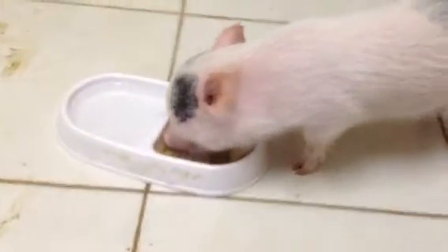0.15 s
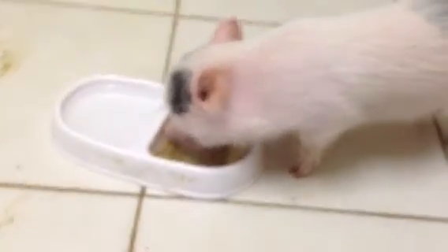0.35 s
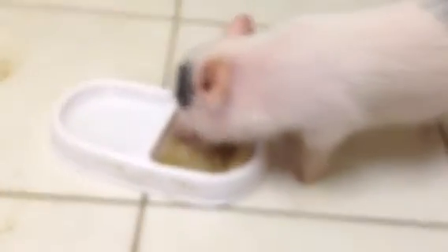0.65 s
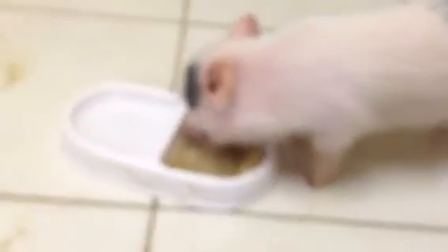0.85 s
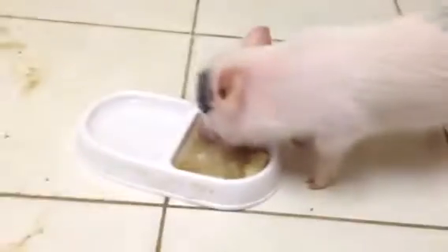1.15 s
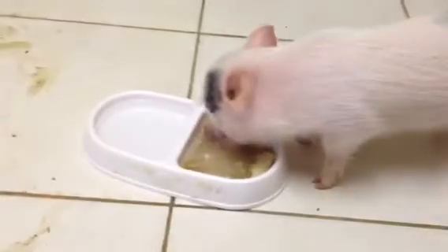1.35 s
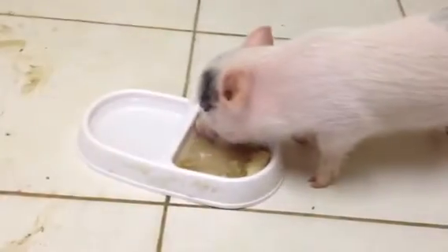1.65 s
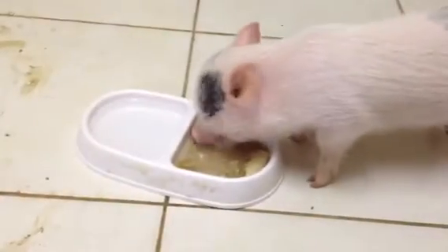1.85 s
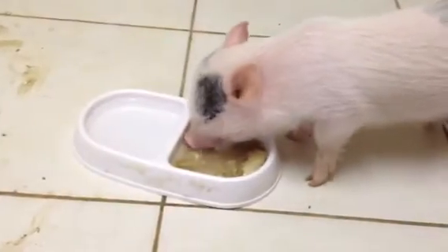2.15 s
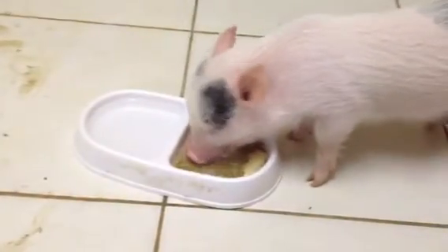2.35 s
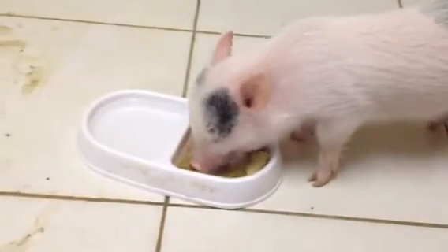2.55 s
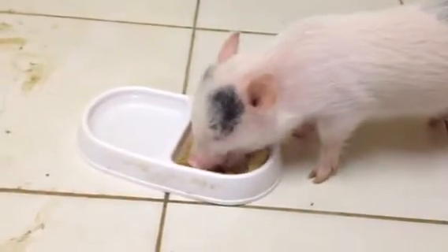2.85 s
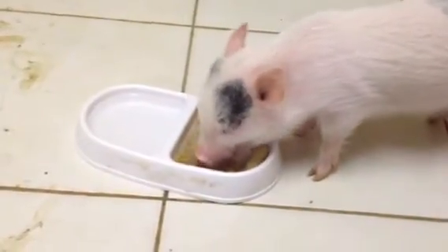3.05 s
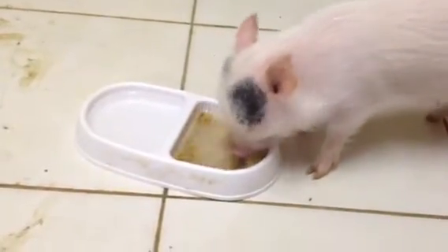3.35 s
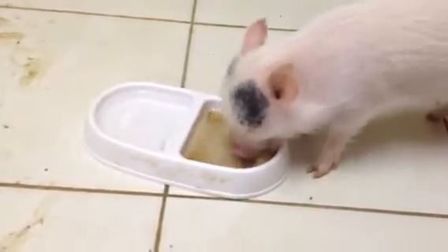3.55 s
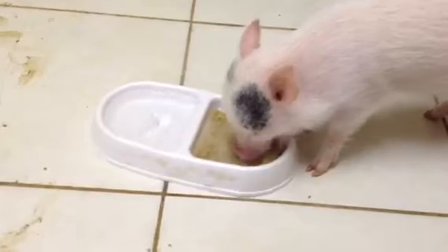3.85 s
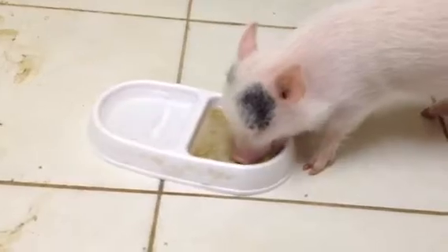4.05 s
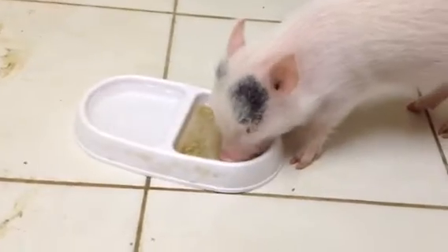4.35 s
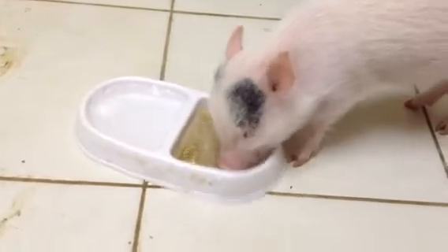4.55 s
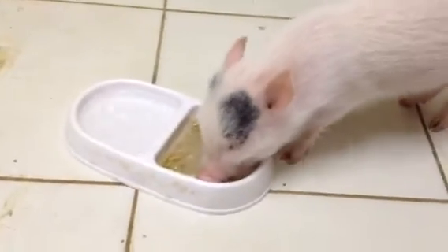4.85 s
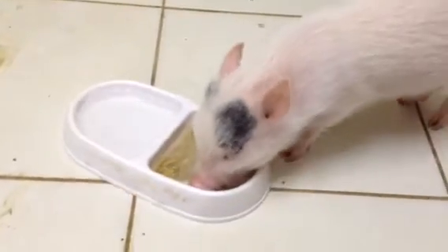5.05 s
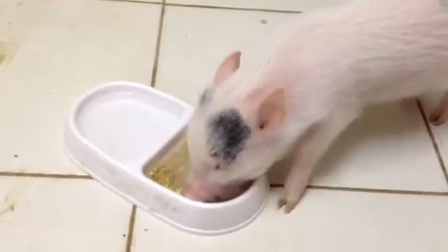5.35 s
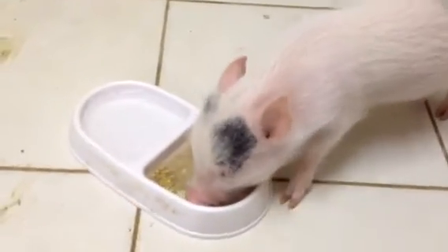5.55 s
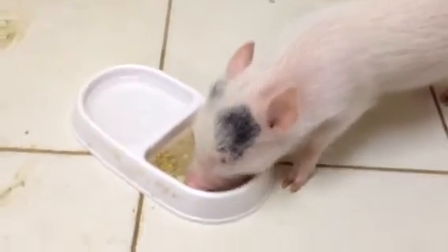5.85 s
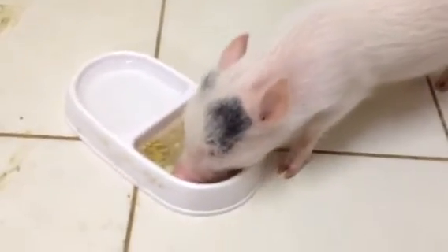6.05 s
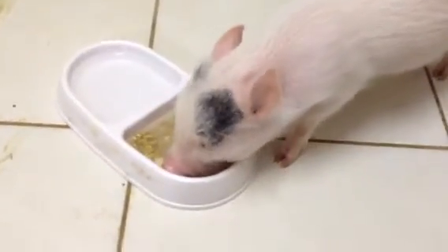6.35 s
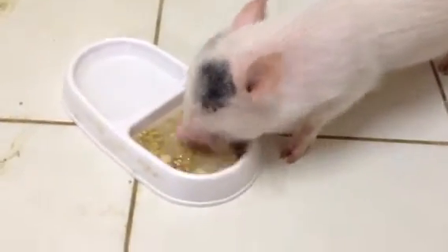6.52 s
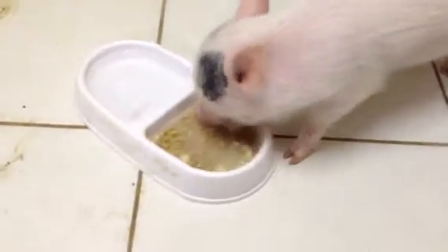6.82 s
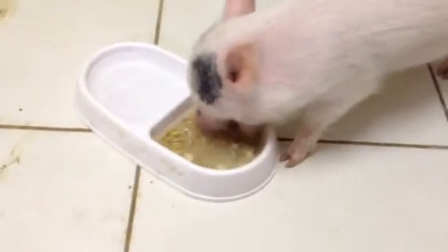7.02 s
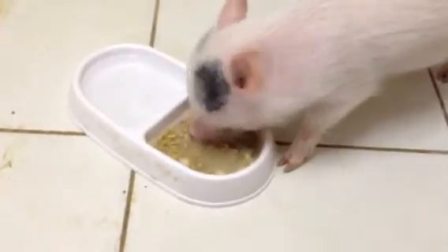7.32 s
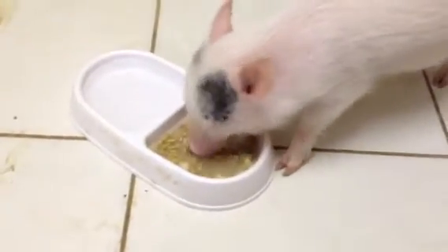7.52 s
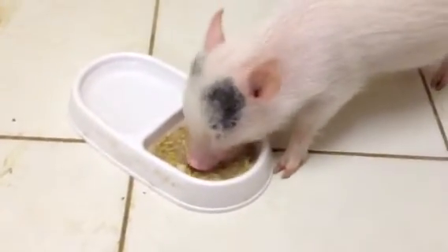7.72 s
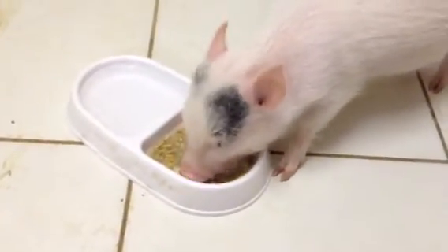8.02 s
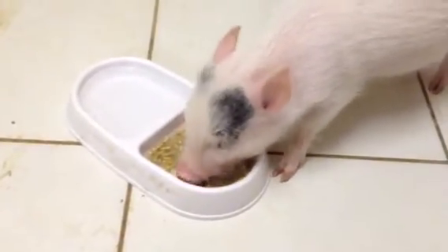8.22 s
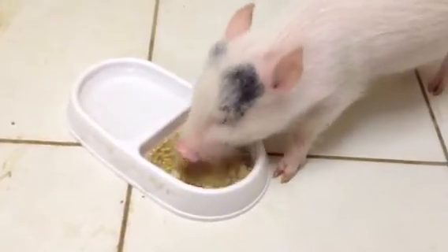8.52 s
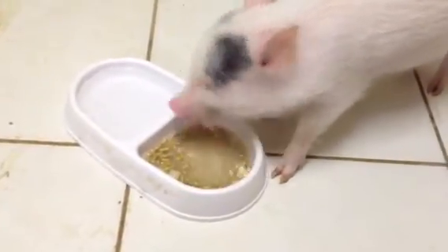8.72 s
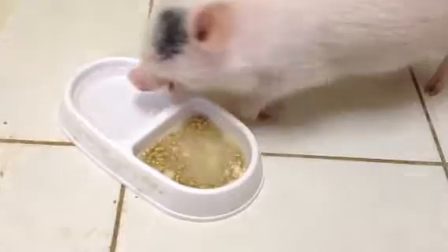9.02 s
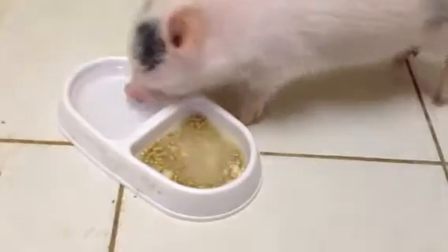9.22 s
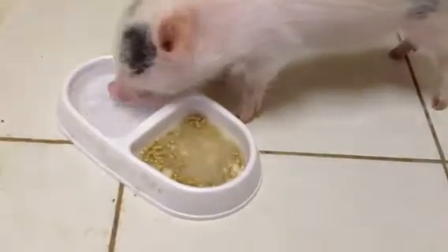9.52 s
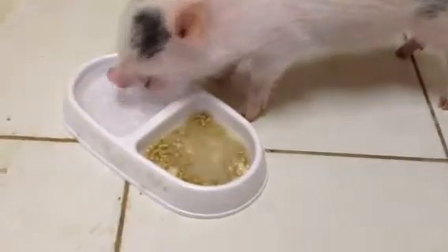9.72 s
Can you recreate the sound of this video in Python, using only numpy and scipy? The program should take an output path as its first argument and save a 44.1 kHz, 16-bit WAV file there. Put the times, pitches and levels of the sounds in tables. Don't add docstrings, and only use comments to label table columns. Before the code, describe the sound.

A piglet smacks and slurps wet mash from a light plastic bowl, scraping it over tiles in a small, ringing hard room.

```python
import sys
import numpy as np
from scipy import signal
from scipy.fft import rfft, irfft
from scipy.io import wavfile
from scipy.ndimage import uniform_filter1d

SR = 44100
rng = np.random.default_rng(int(sys.argv[2]) if len(sys.argv) > 2 else 0)


def digitize_waveform(pressure):
    field = np.atleast_2d(pressure).T
    bounded = np.clip(field, -1, 1)
    quanta = np.round(bounded * 32767).astype(np.int16)
    wavfile.write(sys.argv[1], SR, quanta)


def undo_db(level):
    steps = np.asarray(level, float) / 20
    return 10 ** steps


N = 435708

# (time [s], peak [dB], mouth cavity [Hz], lip gap [Hz], spit [dB re smack])
WET_SMACKS = [(0.108, -14.5, 3700, 7900, -11), (0.623, -15, 4280, 8300, -8), (0.874, -17, 4300, 8640, -3.5),
              (1.0909, -15.5, 3880, 7930, -11.5), (1.804, -29.5, 4300, 6250, -14),
              (1.904, -23, 4900, 7360, -4), (2.164, -51, 4850, 6440, -9), (2.331, -46, 4600, 10900, -8),
              (2.639, -33, 3160, 7850, -9), (2.644, -22, 3630, 8060, -20.5),
              (5.017, -18, 4500, 6200, -10.5), (5.3, -21.5, 4320, 6050, -21),
              (5.755, -28.5, 3940, 11600, -14.5), (3.341, -57, 4300, 7000, -4),
              (6.3046, -22, 4230, 7200, -18), (7.521, -42.5, 5000, 7300, -8), (8.023, -33, 4300, 7600, -17),
              (8.383, -45, 5100, 6800, -12), (8.413, -50, 4870, 6750, -3), (8.454, -32.5, 5020, 7000, -25),
              (8.802, -40, 4000, 6400, -10), (8.958, -36, 4200, 6450, -12), (9.391, -43.5, 3690, 6640, -12),
              (9.855, -57.5, 4530, 7300, 7)]


def at_hz(points, hz):
    table_hz, values = np.transpose(points)
    return np.interp(np.log(hz), np.log(table_hz), values)


def rms_one(x):
    return x / np.sqrt(np.mean(x ** 2) + 1e-20)


def band(x, low_hz, high_hz):
    edges_hz = [low_hz, min(high_hz, SR / 2.2)]
    return signal.sosfilt(signal.butter(2, edges_hz, "band", fs=SR, output="sos"), x)


def resonance(x, hz, width_hz):
    r = np.exp(-np.pi * width_hz / SR)
    zeros = np.array([1, 0, -1]) * (1 - r * r) / 2
    poles = [1, -2 * r * np.cos(2 * np.pi * hz / SR), r * r]
    return signal.lfilter(zeros, poles, x)


def colour(x, spectrum):
    hz = np.maximum(np.fft.rfftfreq(len(x), 1 / SR), 1)
    return rms_one(irfft(rfft(x) * undo_db(at_hz(spectrum, hz)), len(x)))


def patchy(x):
    place = np.linspace(0, 1, len(x) // 2 + 1)
    gain_db = 3.5 * np.interp(place, np.linspace(0, 1, 28), rng.standard_normal(28))
    return irfft(rfft(x) * undo_db(gain_db), len(x))


def grains(per_s, spread_db, size):
    draw = rng.random((3, size))
    strength = undo_db(-spread_db * np.log(np.maximum(draw[0], .01)))
    return (draw[1] < per_s / SR) * strength * np.sign(draw[2] - .5)


def flutter(per_s, depth_db):
    steps = rng.standard_normal(4000)
    return undo_db(depth_db * np.interp(np.arange(N) / SR * min(per_s, 390), np.arange(len(steps)), steps))


def background():
    # (frequency [Hz], level [dB rms])
    hum_tones = [(119.5, -80)]
    # (frequency [Hz], density [dB per Hz])
    air_spectrum = [(12, -43), (20, -47), (38, -26), (86, -13.5), (134, 2), (200, 0.5), (319, -5),
                    (399, -4), (527, -12), (849, -12), (1030, -15), (4060, -10.5), (7520, -12.5),
                    (9670, -21), (14300, -13), (16000, -15)]
    t = np.arange(N) / SR
    hum = sum(undo_db(db) * np.sqrt(2) * np.sin(2 * np.pi * hz * t) * flutter(3.7, .8)
              for hz, db in hum_tones)
    hiss = colour(rng.standard_normal(N), air_spectrum)
    rumble = band(hiss, 140, 450) * (flutter(9.0, 3.0) - 1)
    return hum + undo_db(-68.5) * (hiss + rumble)


def swells(starts_s, held_s, peaks_db, rise_db_per_s, fall_db_per_s):
    late_s = np.arange(0, N + 96, 96) / SR - np.array(starts_s)[:, None]
    rising_db = np.maximum(-late_s * rise_db_per_s, 0)
    easing_db = np.maximum((late_s - np.array(held_s)[..., None]) * fall_db_per_s, 0)
    return np.sum(undo_db(np.array(peaks_db)[:, None] - rising_db - easing_db) ** 2, axis=0)


def snout_levels():
    # (full force reached [s], held [s], bowl scrape [dB], slurp [dB])
    shoves = [(0.0, 0.0032, -55.5, -59.5), (0.36, 0.0068, -70, -46.5), (1.018, 0.0021, -56, -58),
              (2.88, 0.0069, -57, -48), (3.51, 0.033, -38.5, -47), (3.687, 0.0098, -40.5, -44.5),
              (3.9, 0.013, -41.5, -45.5), (4.098, 0.0071, -75, -47.5), (4.353, 0.011, -40.5, -52.5),
              (4.582, 0.026, -31.5, -43), (4.718, 0.28, -44.5, -49), (5.028, 0.0079, -40, -36.5),
              (5.146, 0.0041, -38.5, -51), (5.308, 0.3, -45, -52), (5.551, 0.0028, -50, -50.5),
              (5.66, 0.31, -55.5, -58.5), (6.055, 0.062, -44, -49.5), (6.17, 0.067, -49, -52.5),
              (6.328, 0.002, -41.5, -57), (6.764, 0.017, -33, -42.5), (6.95, .005, -53, -54),
              (7.04, 0.0041, -36.5, -46), (7.389, 0.0058, -46, -50.5), (7.572, 0.053, -52, -55),
              (8.03, 0.0075, -49.5, -50), (8.121, 0.041, -44.5, -47), (8.46, 0.015, -62, -55),
              (8.676, 0.15, -54.5, -52.5), (8.99, 0.047, -69, -49), (9.5, 0.049, -72, -55),
              (9.687, 0.0027, -54, -55)]
    # (time [s], held [s], bowl scrape [dB], slurp [dB])
    nuzzles = [
        (1.34, 0.0092, -61, -56.5),
        (4.2, 0.044, -68, -66),
        (5.24, 0.09, -50.5, -60),
        (6.0, 0.07, -51.5, -58),
        (6.44, 0.12, -64, -56),
        (7.7, 0.095, -61.5, -69),
        (8.33, 0.1, -78, -71),
        (9.13, 0.16, -66, -58.5),
        (9.8, .08, -70, -68),
    ]
    s, held_s, scrape_db, slurp_db = np.transpose(shoves + nuzzles)
    lips_s, lips_db = np.transpose(WET_SMACKS)[:2]
    push_db_per_s, snap_db_per_s = 520, 2988

    bowl = swells(s, held_s, scrape_db, push_db_per_s, 305)
    bowl = bowl + swells(lips_s + 0.0039, 0, lips_db - 30.5, snap_db_per_s, 714.5)
    bowl = bowl + undo_db(-73) ** 2

    mash = swells(s, held_s, slurp_db, push_db_per_s, 230)
    mash = mash + swells(lips_s + 0.0024, 0, lips_db - 26.5, snap_db_per_s, 101.5)
    mash = mash + undo_db(-74.5) ** 2
    return [np.interp(np.arange(N) / 96, np.arange(len(p)), 10 * np.log10(p)) for p in (bowl, mash)]


def scrape(level_db):
    # (frequency [Hz], width [Hz], level [dB])
    bowl_modes = [(560, 169, 6.5), (655, 117, 7.5), (898, 116, 0.5), (1300, 193, 5.5), (1555, 180, -4.5),
                  (1956, 89, 3), (2336, 300, -9.5), (2700, 64, -3), (4300, 120, -3), (4630, 390, -7.5)]
    gusts = flutter(110, 2.0)
    jerks = grains(1800, 2.74, size=N) * gusts
    body = sum((-1) ** k * undo_db(db) * resonance(jerks, hz, width_hz)
               for k, (hz, width_hz, db) in enumerate(bowl_modes))
    skin = band(jerks, 320, 3100)
    grit = band(grains(12000, 3.2, size=N) * gusts, 1800, 19500)
    mix = rms_one(body) + 0.3 * rms_one(skin) + 0.17 * rms_one(grit)
    return undo_db(level_db - 7.0) * rms_one(band(mix, 225, 16200))


def slurp(level_db):
    # (frequency [Hz], density [dB per Hz])
    slurp_spectrum = [(710, -33), (1200, -24), (1310, -31), (2070, -1), (3010, -9), (4340, 1.5), (5260, 0),
                      (6940, -3), (9890, -14), (12200, -11), (15500, -39)]
    crackle = colour(grains(4500, 1.85, size=N), slurp_spectrum)
    return undo_db(level_db - 6.0) * crackle * flutter(70, 5.0) * flutter(14, 2.5)


def pockets(level_db):
    bursts = grains(120, 2.5, size=N) + 1e-18
    dealt = rng.integers(0, 10, N)
    rings = 0
    for k, hz in enumerate(np.geomspace(800, 4600, num=10)):
        ring = resonance(bursts * (dealt == k) + 1e-18, hz, hz / 4.2)
        rings = rings + ring * (1500 / hz) ** 0.16
    return undo_db(level_db - 7.5) * rms_one(rings)


def tearing(part_s, size):
    t = np.arange(size) / SR
    shape = (t / part_s) ** 0.93 * np.exp(-t / part_s)
    clicks = rfft(grains(16000, 3.54, size=size) * shape)
    even = irfft(clicks / (uniform_filter1d(np.abs(clicks), size=5) + 1e-9), size)
    return rms_one(even * np.sqrt(shape)) / 8


def all_smacks():
    # (time [s], peak [dB], mouth cavity [Hz], lip gap [Hz], spit [dB re smack])
    dry_smacks = [(0.033, -48, 4030, 7200, -22), (0.561, -42.5, 2800, 11400, -13),
                  (1.1024, -23, 4500, 6970, 4), (1.171, -25.5, 4440, 9150, -10),
                  (1.649, -55, 4700, 6500, -1), (1.792, -33.5, 4500, 10700, -15),
                  (2.378, -30.5, 3350, 6420, -1), (2.393, -40, 4300, 6900, -8), (1.9, -31, 4360, 7040, -3),
                  (4.26, -42.5, 3900, 7200, -29), (4.793, -15, 4230, 11360, -15),
                  (5.502, -31, 3820, 8050, -14.5), (6.3119, -15, 3860, 7130, -14),
                  (6.3218, -42, 4200, 7160, 3), (6.597, -38, 4300, 12400, -24),
                  (7.125, -28, 3900, 6500, -15), (7.625, -33.5, 4170, 7600, -3.5),
                  (7.907, -26.5, 4550, 6770, -9), (8.099, -28, 3420, 6900, -9),
                  (8.316, -47, 4100, 7410, -25), (8.551, -38, 4350, 7550, -16),
                  (9.042, -33, 4340, 7100, -27), (9.439, -34.5, 4070, 7500, -23),
                  (9.448, -19, 3830, 7700, -11.5)]
    # (time [s], peak [dB], mouth cavity [Hz], splat [dB re smack])
    licks = [(0.052, -56, 2100, -15), (0.345, -34.5, 1370, -14), (0.36, -31.5, 1550, -1),
             (0.418, -38.5, 900, 7), (1.373, -57, 1340, 3), (1.566, -53, 2140, 5), (2.845, -34, 1220, 8.5),
             (2.922, -35.5, 2290, -30), (2.958, -41, 1300, 9), (3.222, -52, 2560, 9), (3.385, -56, 790, 10),
             (3.909, -42, 616, -14), (4.065, -49, 1900, 9), (4.095, -38.5, 1400, -29),
             (4.867, -36.5, 1980, 1), (6.597, -58, 870, -12), (7.127, -48, 990, -7), (9.049, -44, 1080, 6),
             (8.184, -43, 2420, 3), (5.032, -32.5, 2550, 14), (5.31, -41, 2050, 8), (5.766, -39, 1600, 14),
             (9.018, -41, 1900, 0), (7.567, -44, 1890, -21), (5.274, -45, 1280, 7),
             (6.049, -42, 1440, 10.5), (5.999, -48, 1980, 11), (6.848, -44, 1190, 9),
             (3.515, -40, 1350, -8), (3.701, -43, 2010, 3), (9.555, -55.5, 1500, 0), (9.854, -55, 1600, -6),
             (0.29, -57, 784, 7), (5.142, -35.5, 1540, 8), (5.818, -39, 2190, 7), (1.337, -56, 710, 3),
             (8.018, -38.5, 1100, 7.5), (7.318, -43, 2230, 5), (7.384, -42, 1450, 6),
             (7.866, -44.5, 2150, 7), (8.454, -39, 1070, 4), (8.653, -47, 1400, 5),
             (8.682, -39.5, 1610, -12), (8.776, -44, 890, -9), (9.005, -39, 1950, 9),
             (9.252, -41.5, 1320, -2), (9.146, -50, 1200, 0), (9.165, -51, 1100, 0), (4.547, -46, 730, 0),
             (8.011, -45, 1300, 0), (7.605, -48, 620, 0), (5.137, -42, 1900, -8), (9.678, -48, 920, 13),
             (9.818, -53, 1330, -8)]
    # (time [s], peak [dB], mouth cavity [Hz], splat [dB re smack])
    chews = [(0.502, -51, 545, -4), (1.411, -50, 2500, 1), (1.488, -52, 690, -5), (1.847, -32, 1890, -6),
             (2.349, -45.5, 2070, -12), (3.192, -57, 1510, -18), (3.5, -47, 1300, -3),
             (3.53, -43, 2280, -12), (3.672, -44, 1390, 1), (3.864, -53, 950, -1), (3.926, -44, 2000, 7),
             (4.161, -41.5, 1900, 4), (4.298, -47, 1940, 7), (4.329, -42.5, 1030, 2),
             (4.366, -34.5, 2270, -10), (4.562, -44.5, 1310, 14), (4.576, -41, 1340, -9),
             (4.611, -32, 604, -27), (4.693, -40.5, 1230, 8), (4.76, -40.5, 1280, -11),
             (5.554, -20.5, 2500, -16), (6.789, -31.5, 2050, -7), (5.695, -38, 2040, 5),
             (5.881, -43, 2240, 9), (6.759, -35, 1170, 5), (6.779, -30.5, 1330, 5.5),
             (7.019, -48, 1580, 15.5), (7.049, -40, 1790, 3), (7.559, -30.5, 1890, -5),
             (8.16, -28, 2330, -30)]
    splat_db = -5
    partings = [(s, db, hz, splat_db, lips_hz, spit_db)
                for s, db, hz, lips_hz, spit_db in WET_SMACKS + dry_smacks]
    return partings + [(*row, 6970, -6.5) for row in licks] + [(*row, 7300, -25) for row in chews]


def smacks():
    out, t = np.zeros(N + 2048), np.arange(2048) / SR
    for s, peak_db, cavity_hz, splat_db, lips_hz, spit_db in all_smacks():
        wide_open = cavity_hz > 2800
        wetness_db = np.clip(splat_db, -25, 0)
        tear = tearing(0.0022 * (3000 / cavity_hz) ** 0.15, size=2048)
        pop = (t < 1 / SR) + 0.38 * tear
        cavity = resonance(resonance(pop, cavity_hz, cavity_hz / 4), cavity_hz, cavity_hz / 3.75)
        wall = band(patchy(tear), cavity_hz / 1.68, cavity_hz * 1.39)
        wall = band(wall, cavity_hz / 4.5, cavity_hz * 1.47)
        chest = band(tear, 353, 990)
        if wide_open:
            splat = resonance(tear, 1450, 210) + .5 * band(tear, 830, 1630)
        else:
            splat = band(tear, 2640, 5140)
        spit = resonance(resonance(tear, lips_hz, 750), lips_hz, 3300)
        spit = spit + 0.18 * band(patchy(tear), 7000, 12600)
        parts = [(cavity, -9.5),
                 (wall, -4 + 0.37 * wetness_db),
                 (chest, -20 + 1.56 * wetness_db * wide_open),
                 (splat, splat_db - 9.5),
                 (band(spit, 6900, 20600), max(spit_db, -24) + .3)]
        smack = sum(p / np.abs(p).max() * undo_db(db) for p, db in parts)
        tile_echo = np.roll(band(smack, 170, 2400), int(0.002099 * SR))
        smack = smack + wide_open * 0.45 * tile_echo
        at = int(np.clip(s * SR, 0, N))
        out[at:at + 2048] += smack * undo_db(peak_db + 3)
    return out[:N]


def sprays():
    # (time [s], peak [dB],
    # note [Hz])
    wet_sprays = [(0.0744, -64, 8510), (0.359, -27, 10700), (0.4309, -37.5, 10600), (0.626, -18, 9200),
                  (0.8759, -22, 8600), (1.0927, -22.5, 9100), (1.2494, -50.5, 9530), (1.7894, -36, 10800),
                  (1.904, -42, 12600), (2.379, -33.5, 11500), (2.844, -41, 10500), (4.7965, -26, 12300),
                  (5.0185, -36, 12300), (5.3028, -39, 9890), (6.3115, -30, 10000), (7.907, -52, 13400),
                  (8.0985, -43, 8700), (9.446, -47, 8750), (9.5552, -42, 11500), (9.8, -51, 11900),
                  (0.109, -29, 2190), (0.11, -25, 4600), (0.64, -27, 12500), (6.585, -44, 13500),
                 (6.705, -50, 9300), (6.712, -52, 11000), (1.337, -52, 7000), (1.36, -52, 10500),
                 (6.323, -30, 10000), (6.323, -29, 7000), (3.7, -46, 2300), (3.52, -44, 2600),
                 (0.108, -30, 12500), (0.363, -34, 2380), (0.42, -36, 2200), (0.614, -41, 10500),
                 (0.625, -16, 12200), (0.877, -21, 12000), (0.878, -31, 986), (1.097, -22, 2170),
                 (1.175, -36, 9300), (1.911, -36, 7000), (2.176, -60, 11000), (2.298, -54, 8000),
                 (2.342, -52, 12800), (2.646, -50, 532), (2.647, -45, 4080), (2.847, -42, 2750),
                 (2.848, -44, 510), (2.96, -44, 1190), (0.346, -42, 4500), (4.867, -31, 7000),
                 (4.8, -30, 13800), (5.034, -24, 4600), (5.043, -32, 4100), (5.31, -32, 3700),
                 (5.495, -40, 3900), (0.628, -24, 10800), (1.103, -26, 9500), (8.776, -50, 3500),
                 (6.027, -38, 4134), (6.082, -36, 4400), (6.299, -33, 4300), (6.313, -30, 12600),
                 (7.319, -46, 1600), (7.562, -36, 1900), (7.911, -22, 4430), (8.034, -45, 4520),
                 (8.1, -23, 5650), (8.112, -34, 4500), (8.158, -33, 2500), (8.186, -32, 2430),
                 (9.45, -40, 12500), (6.78, -50, 332)]
    # (time [s], peak [dB], note [Hz])
    whistles = [(0.877, -27, 8480), (0.627, -30, 7920), (0.88, -30, 4350), (3.69, -50, 4450),
                (9.041, -42, 4400), (9.19, -55, 3750), (5.024, -32, 4650), (3.515, -42, 1350),
                (3.535, -42, 620), (3.7, -46, 600), (3.908, -46, 880), (9.253, -42, 1440),
                (8.684, -44, 1620), (0.363, -36, 1450)]
    out = np.zeros(N + 2048)
    rows = [(s, db, hz, hz / 12) for s, db, hz in wet_sprays]
    rows += [(*row, 150) for row in whistles]
    for s, peak_db, hz, width_hz in rows:
        spray = resonance(resonance(tearing(0.0013, size=2048), hz, width_hz), hz, hz / 4)
        at = int(s * SR)
        out[at:at + 2048] += spray / np.abs(spray).max() * undo_db(peak_db - 5.5)
    return out[:N]


def gulps():
    # (time [s], peak [dB], pitch [Hz])
    throat_gulps = [(0.158, -58, 587), (0.497, -59, 506), (0.679, -53, 480), (1.003, -53, 563),
                    (1.104, -47.5, 876), (0.882, -48, 557), (1.169, -53, 574), (2.498, -66, 161),
                    (3.384, -60.5, 495), (3.548, -51.5, 596), (3.699, -56, 300), (3.919, -49.5, 620),
                    (4.158, -56, 560), (4.463, -56.5, 387), (4.858, -66, 590), (5.907, -55, 218),
                    (6.944, -53.5, 189), (7.049, -44.5, 600), (7.234, -65.5, 193), (7.359, -55.5, 467),
                    (8.713, -55, 570), (8.803, -53.5, 685), (5.558, -55, 560), (4.895, -48.5, 605),
                    (8.75, -55, 497), (8.977, -57, 217), (9.052, -55, 556), (9.495, -58, 230),
                    (9.549, -57, 456)]
    # (time [s], peak [dB], pitch [Hz])
    thumps = [(1.337, -61, 183), (1.509, -65, 221), (1.649, -66, 269), (2.004, -62, 205), (2.174, -61, 194),
              (2.656, -60, 199), (3.383, -61, 258), (5.359, -58, 183), (6.299, -61, 215), (6.426, -64, 196),
              (6.758, -56, 318)]
    out, t = np.zeros(N + 4096), np.arange(4096) / SR
    swell = (t / 0.0023) * np.exp(1 - t / 0.0034)
    for s, peak_db, hz in throat_gulps + thumps:
        tone = np.sin(2 * np.pi * hz * t * (0.912 + 4.4 * t))
        rough = rms_one(band(rng.standard_normal(4096), hz / 5.7, hz * 2.26))
        at = int(s * SR)
        out[at:at + 4096] += (tone + .5 * rough) * swell * undo_db(peak_db + 2.5)
    return band(band(out[:N], 135, 3000), 130, 6000)


def room_response():
    # (frequency [Hz], decay by 60 dB [s])
    decay_times = [(300, 0.38), (800, 0.21), (2100, 0.38), (5500, 0.25), (14600, 0.34)]
    # (delay [s], level [dB])
    near_echoes = [
        (.0011, -10),
        (.0029, -10),
        (.0062, -10),
        (.0117, -13),
    ]
    t = np.arange(SR // 2) / SR
    edges_hz = 150 * 2 ** np.arange(0, 7.1, .5)
    tail = 0
    for low, high in zip(edges_hz, edges_hz[1:]):
        leak_db = 4.5 * max(np.log2(900 / low), 0)
        decay = undo_db(-60 * t / at_hz(decay_times, low * 0.9))
        tail = tail + band(rng.standard_normal(len(t)), low, high) * decay * undo_db(-leak_db)
    tail = tail * (1 - np.exp(-t / 0.00053))
    response = undo_db(-1) * tail / np.sqrt(np.sum(tail ** 2))
    response[0] = 1
    for (s, db), shift in zip(near_echoes, rng.uniform(0.93, 1.4, len(near_echoes))):
        response[int(s * shift * SR)] += undo_db(db)
    return response


def room(x, count=5):
    place = np.arange(N) // 10000 % count
    return sum(signal.fftconvolve(x * (place == k), room_response())[:N] for k in range(count))


def scene():
    scrape_db, slurp_db = snout_levels()
    bowl = scrape(scrape_db) + slurp(slurp_db) + pockets(slurp_db)
    mouth = smacks() + sprays() + gulps()
    return (room(bowl + mouth) + background())[None]


def roll_off(x):
    return signal.sosfilt(signal.butter(12, 16520, fs=SR, output="sos"), x)


def record(dry):
    # (frequency [Hz], width [Hz], gain [dB])
    port_peaks = [(5080, 400, -4.5), (5720, 2060, -6), (4720, 9200, -2.5), (8060, 2680, 4),
                  (9800, 5300, 0.5)]
    for hz, width_hz, db in port_peaks:
        dry = dry + (undo_db(db) - 1) * resonance(dry, hz, width_hz)
    dry = signal.sosfilt(signal.cheby2(10, 26, 15650, fs=SR, output="sos"), dry)
    dry = .52 * np.tanh(dry / .52)
    return roll_off(dry)


dry = scene()
out = record(dry)
digitize_waveform(out)
```